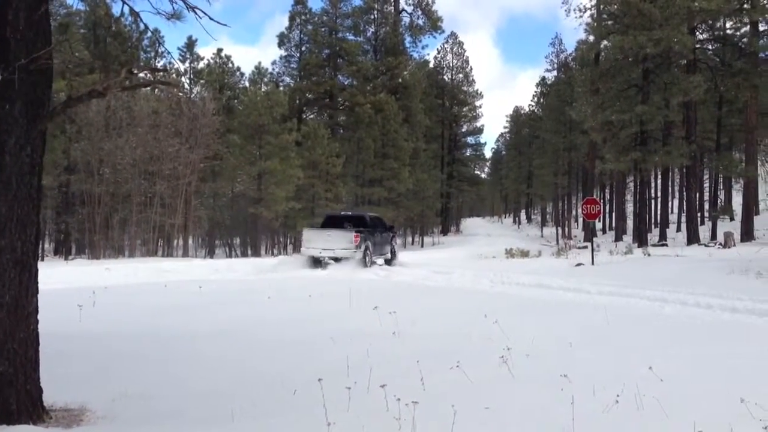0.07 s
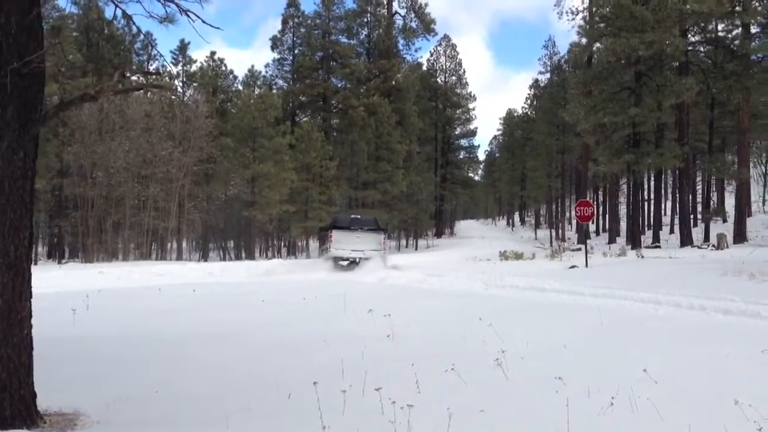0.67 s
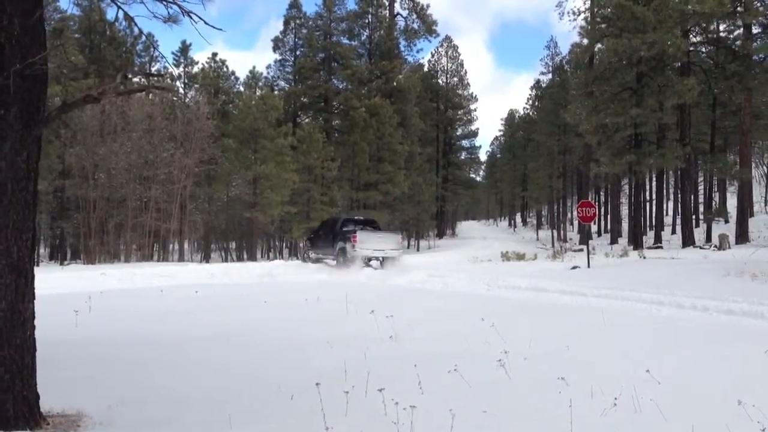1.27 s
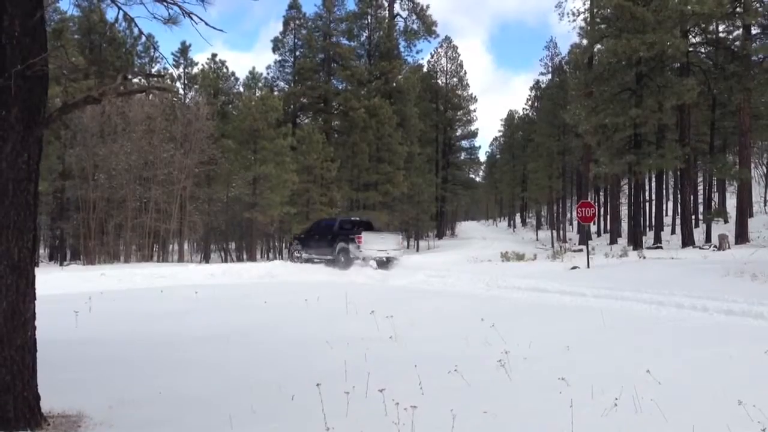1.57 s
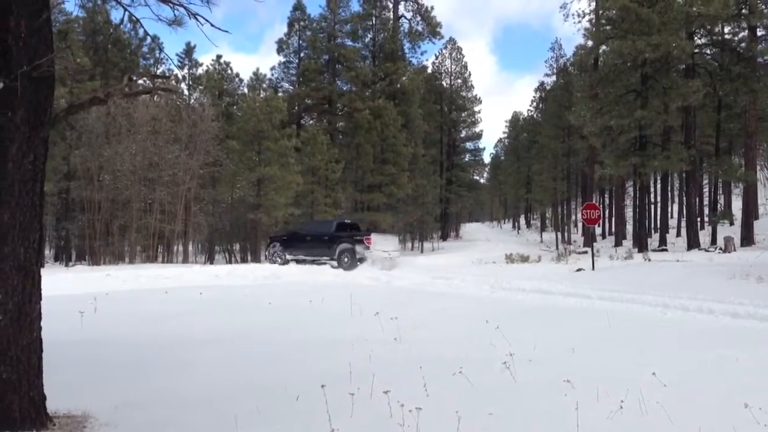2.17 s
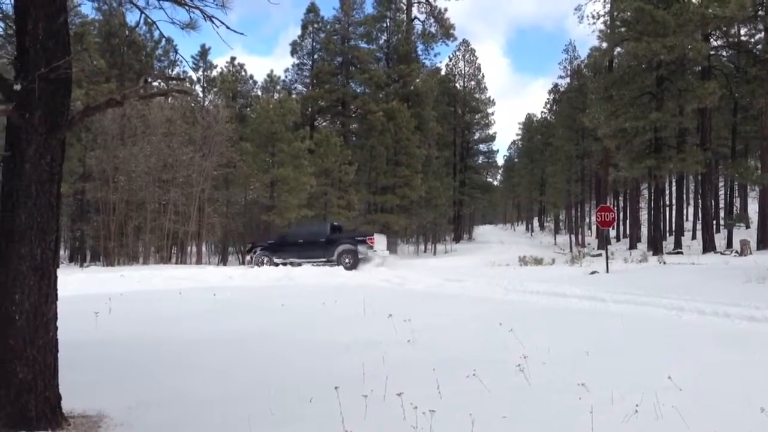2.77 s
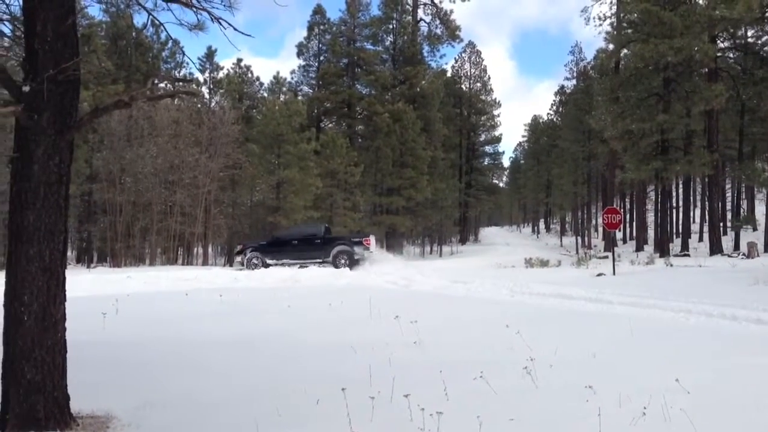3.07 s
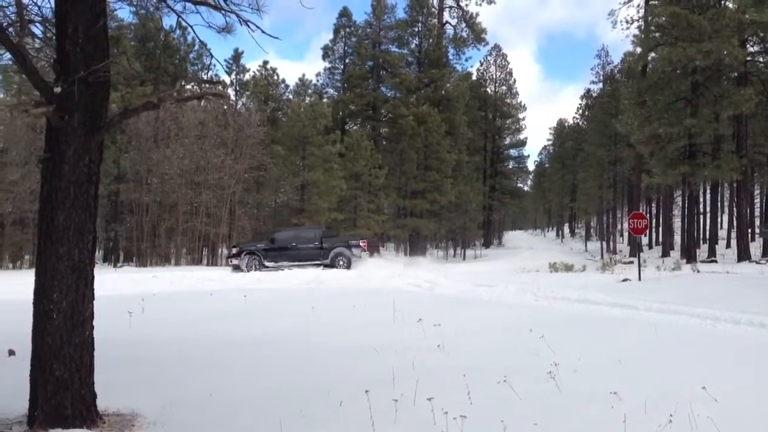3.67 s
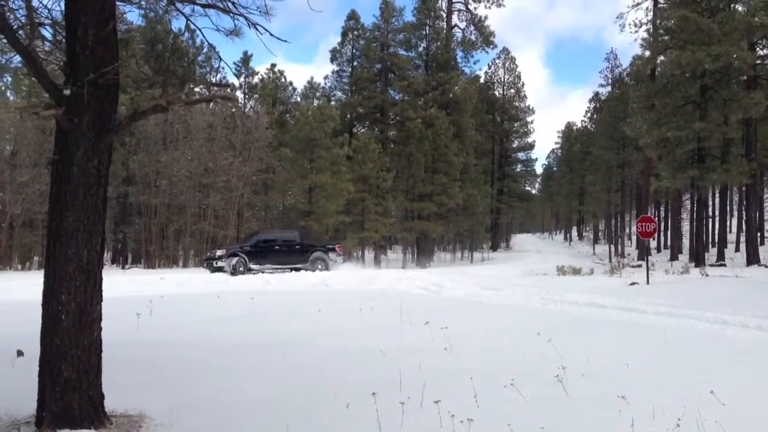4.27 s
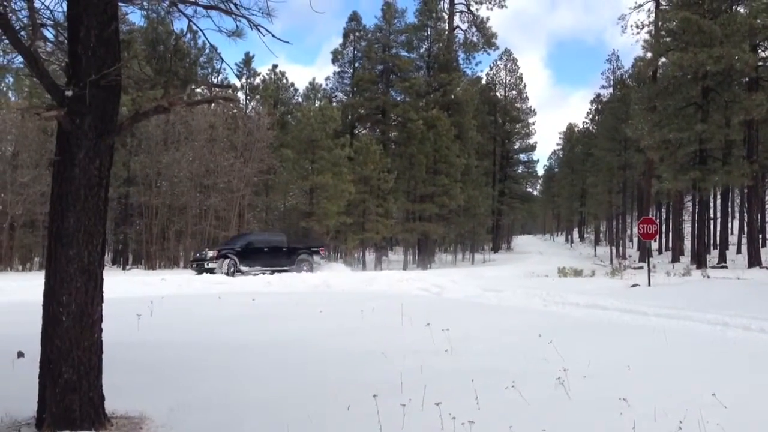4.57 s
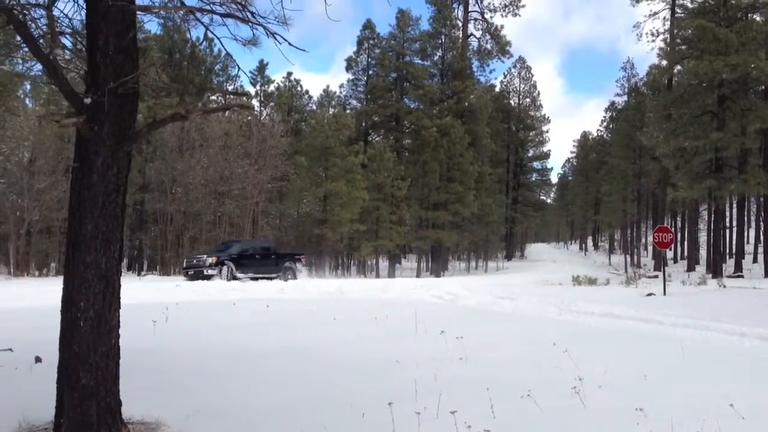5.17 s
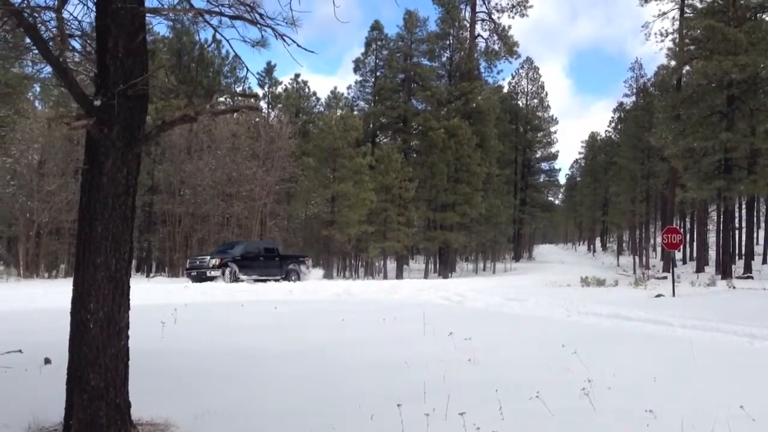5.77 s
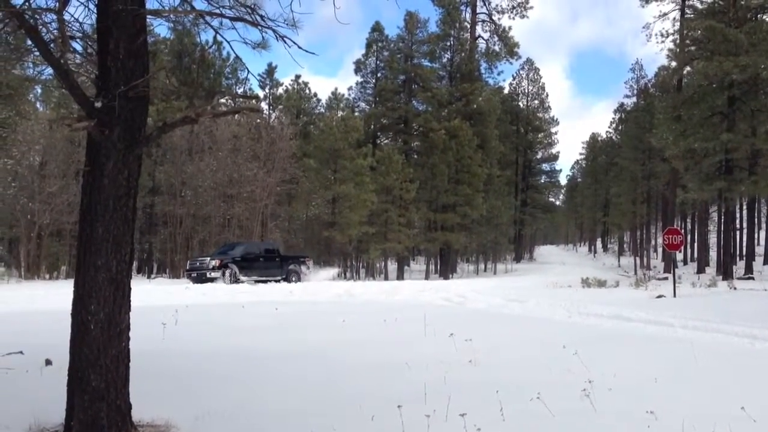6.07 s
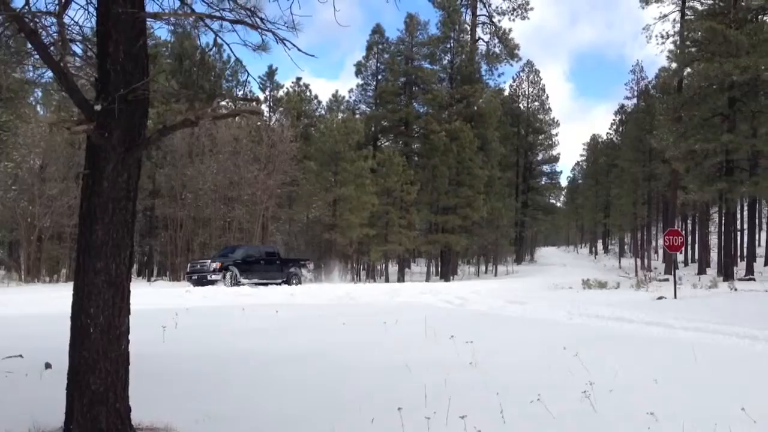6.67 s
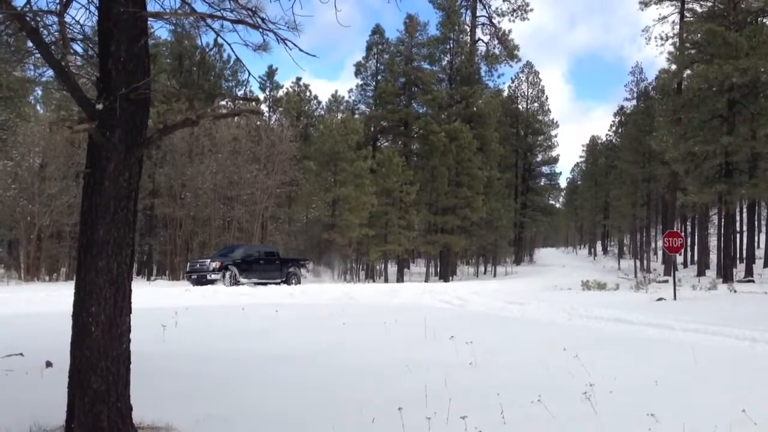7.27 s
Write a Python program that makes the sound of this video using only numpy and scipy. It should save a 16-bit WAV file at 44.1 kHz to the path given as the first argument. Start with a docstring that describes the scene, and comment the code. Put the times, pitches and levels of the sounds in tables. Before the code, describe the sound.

Dull wind buffets and a low rumble on the microphone, over a faint, faraway truck engine and tyres spraying snow.

```python
"""A pickup truck swings round on a snowy forest road, far from the microphone: its V8 revs through the
exhaust pipe, the tyres churn and spray snow, then it rolls away gently with two faint squeaks.
Close by, eddies of wind buffet the microphone in short dull bumps over a lumpy rumble.
Behind it all lie the rush of the pines and a faint steady hiss."""
import sys
import numpy as np
from scipy import signal
from scipy.fft import rfft, irfft, next_fast_len
from scipy.io import wavfile

SR = 44100
rng = np.random.default_rng(int(sys.argv[2]) if len(sys.argv) > 2 else 0)


def master(y):
    """Save y as 16-bit WAV."""
    cut = np.clip(np.atleast_2d(y).T, -1, 1)
    pcm = np.round(cut * 32767)  # scale
    wavfile.write(sys.argv[1], SR, pcm.astype(np.int16))


N = 326781

# spectra of the pines all round, the hiss and the wind at the microphone: f/Hz, relative level/dB
PINES_SPECTRUM = [(25, -22), (60, -14), (100, -3), (150, 2.5), (210, -3), (300, -11.5), (600, -21.5),
                  (1200, -18), (3000, -27), (8000, -44)]
HISS_SPECTRUM = [(100, -2), (2000, 1.5), (5000, 4.5), (9000, 5), (15000, 4), (18000, -3.5)]
WIND_SPECTRUM = [(25, -33), (55, -22), (85, -7), (120, 0), (170, 3), (230, 0), (320, -8.5), (480, -13.5),
                 (800, -21.5), (1600, -45)]
# air flow over the microphone, rising and dropping in gusts: t/s, relative level/dB
AIR_FLOW = [(1.05, -77), (1.5, -64.5), (1.8, -73), (2.2, -59.5), (2.5, -69.5), (3.2, -65.5), (3.65, -58),
            (4.3, -57.5), (4.75, -56.5), (4.9, -57), (5.2, -56.5), (5.6, -73), (6.22, -66.5), (6.42, -62),
            (6.65, -63.5), (7.41, -58.5)]
# buffets ahead of the microphone port: t/s, relative level/dB, f/Hz, half duration/s
BUFFETS = [(0.931, -42, 200, .006), (1.538, -45, 205, .018), (1.735, -47, 210, 0.0052),
           (1.954, -41, 235, 0.015), (1.994, -46.5, 186, 0.0087), (2.021, -44.5, 500, 0.0031),
           (2.179, -41, 170, 0.0087), (2.207, -37, 236, 0.019), (2.288, -43.5, 190, 0.0089),
           (2.701, -39, 192, 0.0031), (2.923, -46, 210, 0.0091), (3.306, -44, 225, 0.0043),
           (3.361, -40, 213, .004), (3.439, -19.5, 343, 0.0098), (3.47, -27, 403, .011),
           (3.482, -26.5, 217, 0.0052), (3.506, -28.5, 215, 0.0093), (3.715, -38, 198, 0.011),
           (3.818, -40.5, 273, 0.0043), (3.871, -38, 251, 0.015), (3.95, -27, 256, 0.0051),
           (4.149, -29, 186, 0.0097), (4.261, -38.5, 184, 0.0043), (4.432, -36, 233, 0.0075),
           (4.461, -36.5, 285, 0.0087), (4.76, -35.5, 275, 0.0092), (4.798, -35.5, 251, .026),
           (5.075, -42, 193, 0.0065), (5.119, -37, 212, 0.017), (5.227, -12.5, 272, .013),
           (5.253, -19, 303, 0.0095), (5.299, -23.5, 232, .016), (5.414, -44, 161, .005),
           (5.789, -46, 206, 0.0041), (5.958, -43, 196, 0.0067), (6.142, -38.5, 284, 0.0046),
           (6.408, -44, 193, 0.0058), (6.767, -45.5, 220, 0.0044), (6.842, -39, 400, .012),
           (6.94, -32, 265, .014), (7.131, -39, 263, 0.0091), (7.356, -42.5, 176, 0.0074),
           (7.394, -34.5, 237, 0.0054)]
# faint squeaks from the truck: t/s, relative level/dB, f/Hz, half duration/s
SQUEAKS = [(5.76, -62.5, 2625, 0.018), (6.028, -59.5, 2420, 0.0073)]
# faint narrow bands of noise that swell and fade: t/s, level/dB, f/Hz, width/Hz, half duration/s
NOISE_BANDS = [(0.427, -72, 5000, 240, 0.077), (.52, -56.5, 482, 220, 0.089),
               (0.498, -66, 1636, 400, 0.098), (3.2, -67, 1129, 220, 0.51), (5.202, -74.5, 2900, 350, 0.52),
               (6.5, -69.5, 2986, 900, .14), (7.252, -58.5, 519.6, 160, 0.17)]
# spectra of the far roar, churned snow and fine spray: f/Hz, relative level/dB
ROAR_SPECTRUM = [(100, -19), (250, -6.5), (400, 0.5), (540, -1.5), (700, -1.5), (880, -4), (1100, -6.5),
                 (1400, -11), (2000, -18.5), (3500, -39.5)]
CHURN_SPECTRUM = [(700, -20), (1200, -11), (1600, -1.5), (2100, 2.5), (2400, 2.5), (2850, 1), (3400, -3.5),
                  (4500, -18), (8000, -32)]
SPRAY_SPECTRUM = [(1500, -16), (2800, -5), (3800, 0), (4500, -2), (5000, -2.5), (5700, -5.5), (7000, -8.5),
                  (9000, -18.5), (14000, -37)]
# the tyres dig in at the turn, then twice more pulling away: t/s, roar/dB, churn/dB, spray/dB
TYRES = [(0, -58.5, -74, -72.5), (.3, -57.5, -71, -65), (.49, -53, -64.5, -65.5), (.7, -57.5, -74, -72.5),
         (.95, -60.5, -80, -79), (2.45, -59.5, -70.5, -76.5), (2.9, -60, -68, -70.5),
         (3.42, -58.5, -67, -70.5), (3.68, -60, -71.5, -71.5), (4.15, -59, -68.5, -71.5),
         (4.8, -60, -66.5, -73.5), (5.75, -59.5, -66, -70), (5.92, -60, -73.5, -72),
         (6.25, -61.5, -76, -75), (6.48, -61, -69, -70), (7.41, -63.5, -78, -80)]
# exhaust orders: multiple of the cycle rate, relative level/dB
EXHAUST_ORDERS = [(5, 2), (6, -6), (7, -1.5), (8, -4.5), (9, 2), (10, -4.5), (11, -6), (12, -8), (13, -2),
                  (14, -14), (15, -3), (16, -7), (17, -8), (18, -10), (21, -24), (24, -19.5), (26, -18),
                  (32, -18)]
# the driver revs through the turn, blips once, then cruises: t/s, cycle rate/Hz, level before the pipe/dB
ENGINE_REVS = [(0, 19.25, -51), (.17, 19.55, -52.5), (.32, 20.7, -52), (.62, 20.6, -55.5), (.85, 17.6, -65),
               (1, 17.5, -87), (1.25, 23, -61.5), (1.45, 15.5, -73.5), (7.41, 14, -73.5)]


def from_db(db):
    """Decibels to gain."""
    return 10 ** (np.asarray(db) / 20)


def rms_one(x):
    """Scale to rms 1."""
    return x / np.sqrt(np.mean(x ** 2) + 1e-20)


def in_time(rows):
    """Each column of a curve at every sample."""
    times, *columns = np.transpose(rows)
    return [np.interp(np.arange(N) / SR, times, column) for column in columns]


def drift(rate_hz):
    """A smooth random wander of rms about 1."""
    step, settle = 40, 2000
    pole = np.exp(-2 * np.pi * rate_hz * step / SR)
    white = rng.standard_normal(N // step + settle + 2)
    slow = signal.lfilter([1], [1, -2 * pole, pole * pole], white)[settle:]
    return np.interp(np.arange(N) / step, np.arange(len(slow)), rms_one(slow))


def colour(x, spectrum):
    """Give a steady sound a spectrum; rms 1."""
    hz, db = np.transpose(spectrum)
    size = next_fast_len(N)
    bins_hz = np.maximum(np.fft.rfftfreq(size, 1 / SR), 1)
    gain = from_db(np.interp(np.log(bins_hz), np.log(hz), db))
    return rms_one(irfft(rfft(x, size) * gain, size)[:N])


def noise(spectrum):
    """Smooth noise of a given colour; rms 1."""
    return colour(rng.standard_normal(N), spectrum)


def swell(t, half_s):
    """An envelope that rises and dies away around t = 0."""
    return 1 / np.cosh(np.clip(t / half_s, -50, 50))


def forest():
    """The bed of the place: the rush of the pines and a faint steady hiss."""
    return from_db(-62) * noise(PINES_SPECTRUM) + from_db(-70) * noise(HISS_SPECTRUM)


def add_eddy(out, s, db, hz, turn, crest_db, half_cycles=0.41):
    """One eddy rocks the pressure for a few swings, steepest at their height; small eddies are quick."""
    centre = int(s * SR)
    near = np.arange(*np.clip([centre - SR // 20, centre + SR // 20], 0, N))
    age = near / SR - s
    phase = 2 * np.pi * (hz * age + turn)
    core = swell(age, half_cycles / hz)
    steepening = from_db(crest_db) * core * np.sin(2 * phase)
    out[near] += from_db(db) * core * (np.cos(phase) + steepening)


def puffs(flow_db, per_s=9, lift_db=15, spread_db=2, centre_hz=196, octaves=0.53):
    """Small eddies reach the microphone by chance, as strong as the air flow allows."""
    out = np.zeros(N)
    arrivals = np.flatnonzero(rng.random(N) < per_s / SR)
    turn = rng.random(N)
    strength, pitch = rng.uniform(-1.03, 1, (2, N))
    for i in arrivals:
        db = flow_db[i] + lift_db + spread_db * strength[i]
        hz = centre_hz * 2 ** (octaves * pitch[i])
        add_eddy(out, i / SR, db, hz, turn[i], crest_db=-20)
    return out


def buffets(shed_count=4, scatter_octaves=0.36, sink_octaves=0.14, crest_db=-16.5, wake_db=-22):
    """Right on the microphone: a slap and a strong eddy, with weaker ones shed in a turbulent wake."""
    t, out = np.arange(N) / SR, np.zeros(N)
    wake = noise(WIND_SPECTRUM)
    chance = rng.random((len(BUFFETS), shed_count + 1, 3))
    for (s, db, hz, half_s), (turns, *shed) in zip(BUFFETS, chance):
        add_eddy(out, s - 0.00196, db - 9, hz * 1.65, turns[0], crest_db)  # the quick opening slap
        add_eddy(out, s, db, hz, turns[1], crest_db)
        for place, (turn, jitter, pitch) in zip(np.linspace(-1, 1, shed_count), shed):
            when = s + half_s * (place + (jitter - .5) / 2)
            octaves = scatter_octaves * (2 * pitch - 1) - sink_octaves * place  # later ones tend lower
            add_eddy(out, when, db - 6.5, hz * 0.92 * 2 ** octaves, turn, crest_db)
        out += from_db(db + wake_db) * wake * swell(t - s, 0.95 * half_s)
    return out


def microphone_port(pressure, low_hz=121, high_hz=1190):
    """The microphone port passes only the low middle of the wind's pressure."""
    low_cut = signal.butter(2, low_hz, "high", fs=SR, output="sos")
    high_cut = signal.butter(6, high_hz, "low", fs=SR, output="sos")
    return signal.sosfilt(np.vstack([low_cut, high_cut]), pressure + 1e-18)


def wind(lumps_db=4.5, lumps_hz=17):
    """Air flowing over the microphone: a lumpy rumble, with small puffs and stronger buffets."""
    flow_db, = in_time(AIR_FLOW)
    rumble = from_db(flow_db - 0.5 + lumps_db * drift(lumps_hz)) * noise(WIND_SPECTRUM)
    eddies = buffets() + puffs(flow_db)
    return rumble + from_db(2) * microphone_port(eddies)


def noise_bands():
    """Faint narrow bands of noise swell and fade, from a low hum to a thin high whine."""
    t, out = np.arange(N) / SR, np.zeros(N)
    for s, db, hz, width_hz, half_s in NOISE_BANDS:
        phase = 2 * np.pi * hz * t
        band = drift(width_hz / 2) * np.cos(phase) + drift(width_hz / 2) * np.sin(phase)
        out += from_db(db) * swell(t - s, half_s) * band
    return out


def squeaks(octave_db=-17, rasp_db=-9, waver=0.0088):
    """Short rubbing squeaks, faint at this distance: a wavering tone, its octave and a little rasp."""
    t, out = np.arange(N) / SR, np.zeros(N)
    rasp = from_db(rasp_db) * noise(SPRAY_SPECTRUM)
    bend = 1 + waver * drift(90)
    grip = 1 + .5 * drift(160)  # the rubbing catches and slips
    for s, db, hz, half_s in SQUEAKS:
        phase = 2 * np.pi * np.cumsum(hz * bend) / SR
        tone = np.sin(phase) + from_db(octave_db) * np.sin(2 * phase)
        out += from_db(db) * swell(t - s, half_s) * grip * (tone + rasp)
    return out


def snow(spectrum, clump_db, grains_per_s=16000):
    """Countless grains crushed and flung by the treads, arriving in clumps."""
    arrivals = rng.random(N) < grains_per_s / SR
    grains = arrivals * rng.standard_normal(N)
    return colour(grains * from_db(clump_db * drift(15)), spectrum)


def far_roar(cycles, throb=0.19, flutter_db=1.5):
    """Engine and treads roar, pulsing eight times a cycle; moving air on the way wavers each band."""
    firing = 1 + throb * np.cos(2 * np.pi * 8 * cycles)
    roars = [colour(rng.standard_normal(N) * firing, ROAR_SPECTRUM) for _ in range(2)]
    edges_hz = np.geomspace(120, 2800, 15)
    out = np.zeros(N)
    for k, band in enumerate(zip(edges_hz, edges_hz[1:])):
        band_pass = signal.butter(2, band, "band", fs=SR, output="sos")
        out += signal.sosfilt(band_pass, roars[k % 2]) * from_db(flutter_db * drift(6.4))
    return rms_one(out)


def exhaust(cycle_hz, cycles, pipe_hz=155, pipe_width_hz=3.5, pipe_db=15.5, rough=.11, wander=.012):
    """Uneven firing sounds multiples of the four-stroke cycle rate; they boom at the pipe's resonance."""
    out, power = np.zeros(N), 0
    for order, db in EXHAUST_ORDERS:
        boom_db = pipe_db / (1 + ((order * cycle_hz - pipe_hz) / pipe_width_hz) ** 2)
        phase = 2 * np.pi * (order * cycles + rng.random()) + wander * order * drift(2.9)
        out += from_db(db + boom_db) * (1 + rough * drift(13)) * np.sin(phase)
        power += from_db(db) ** 2 / 2
    return out / np.sqrt(power)


def truck():
    """The pickup far down the road: V8 exhaust, roar and snow, with faint noise bands and squeaks."""
    cycle_hz, exhaust_db = in_time(ENGINE_REVS)
    roar_db, churn_db, spray_db = in_time(TYRES)
    cycles = np.cumsum(cycle_hz) / SR
    out = from_db(exhaust_db) * exhaust(cycle_hz, cycles)
    out += from_db(roar_db) * far_roar(cycles)
    out += from_db(churn_db) * snow(CHURN_SPECTRUM, clump_db=1.53)
    out += from_db(spray_db) * snow(SPRAY_SPECTRUM, clump_db=1.0)
    return out + noise_bands() + from_db(0.5) * squeaks()


def scene():
    """One microphone among the pines: forest all round, wind up close, the truck far off."""
    return (forest() + wind() + truck())[None]


def record(dry):
    """The microphone chain cuts the top steeply."""
    cutoff_hz = 15350
    return signal.sosfilt(signal.ellip(16, .1, 70, cutoff_hz, fs=SR, output="sos"), dry)


dry = scene()
out = record(dry)
master(out)
```